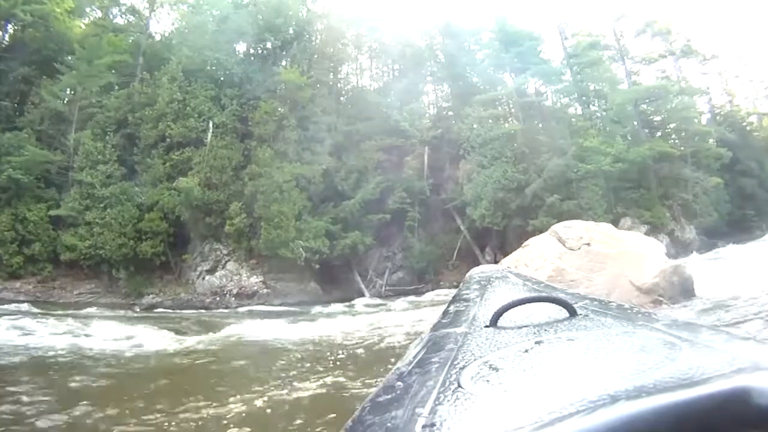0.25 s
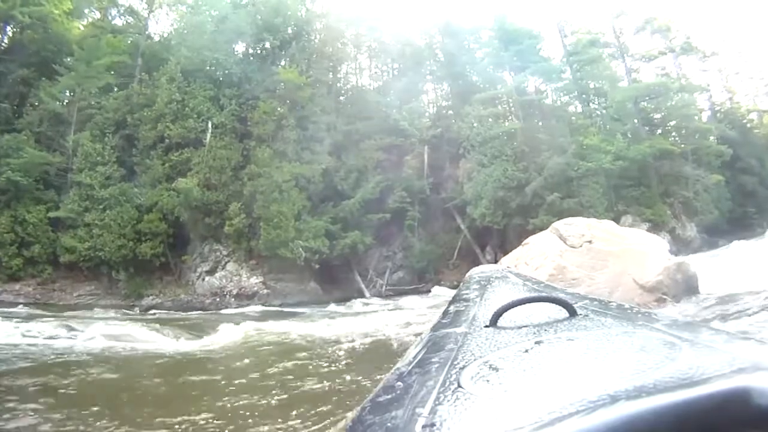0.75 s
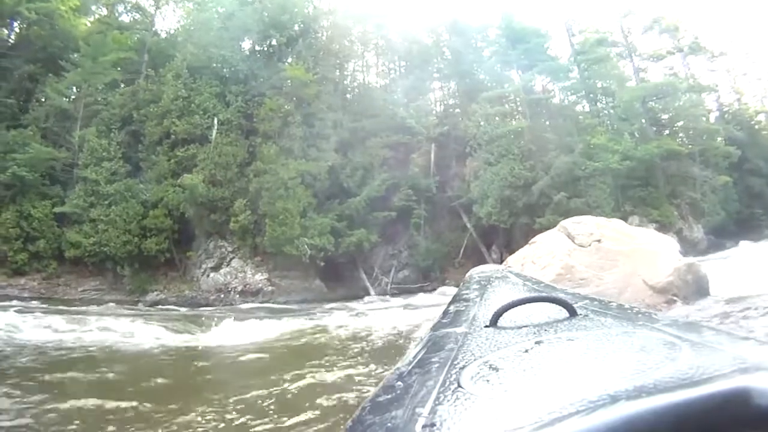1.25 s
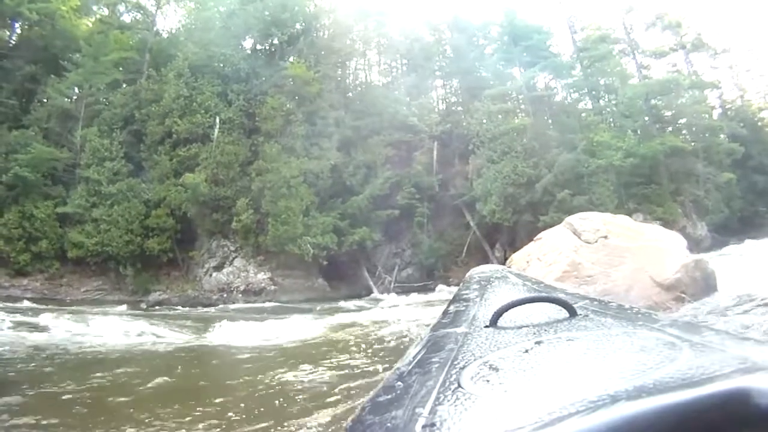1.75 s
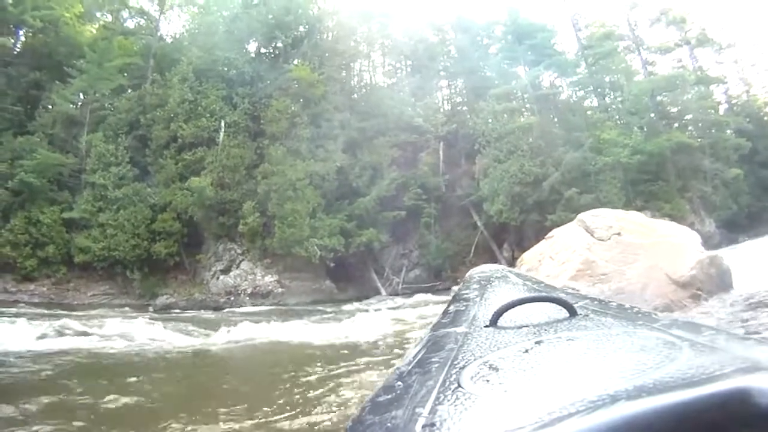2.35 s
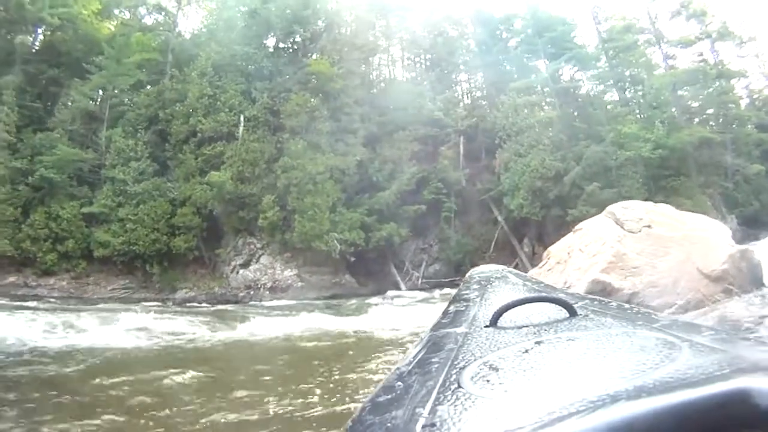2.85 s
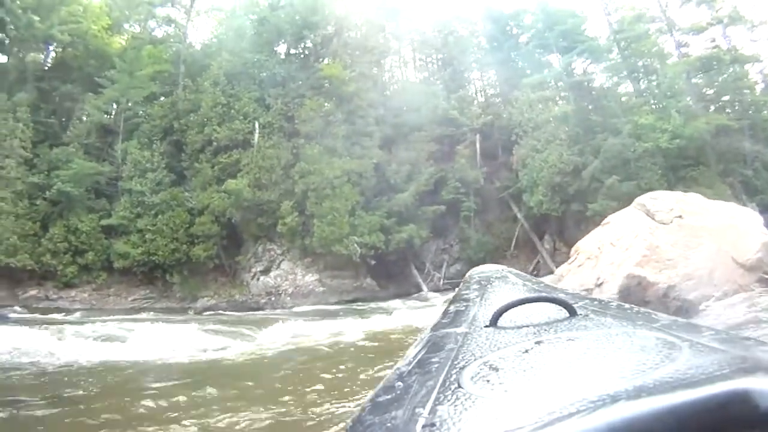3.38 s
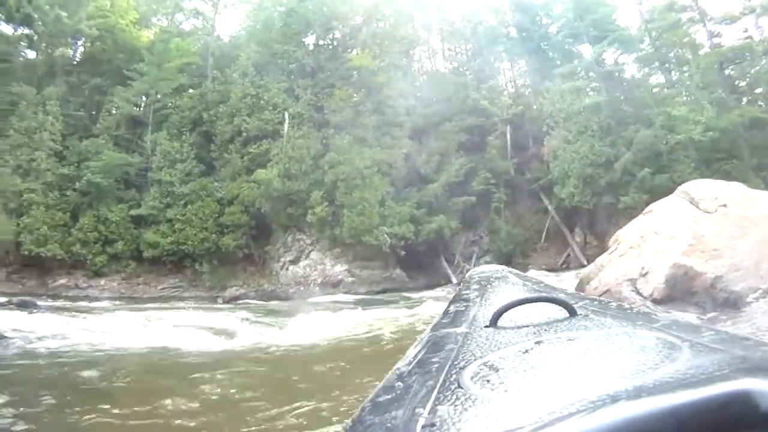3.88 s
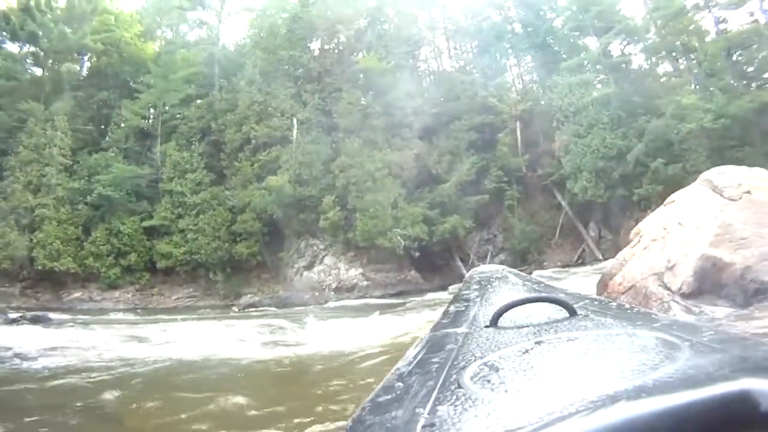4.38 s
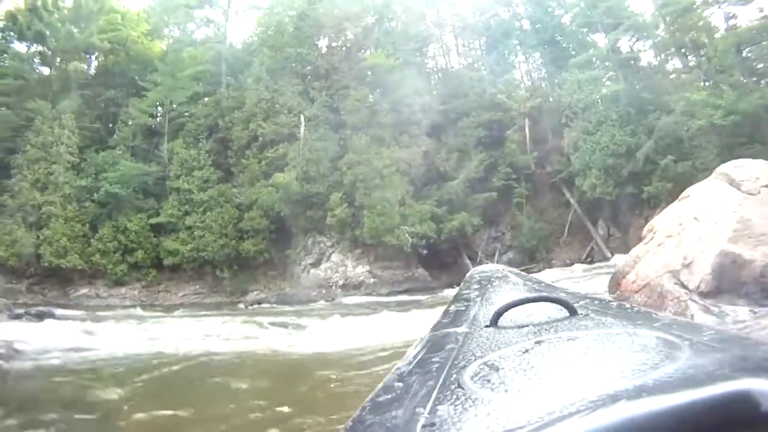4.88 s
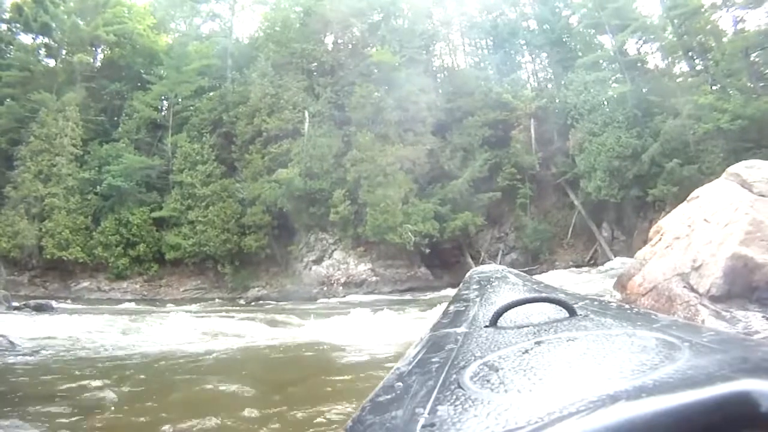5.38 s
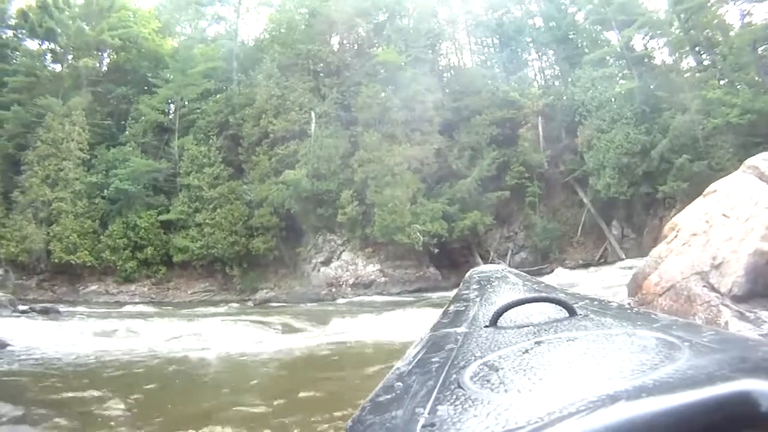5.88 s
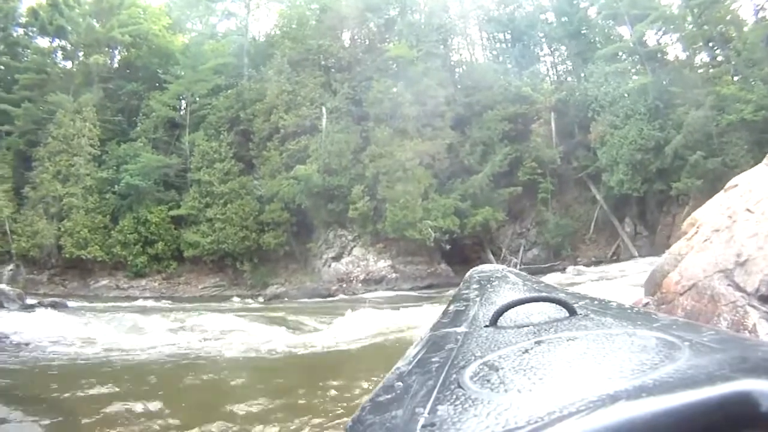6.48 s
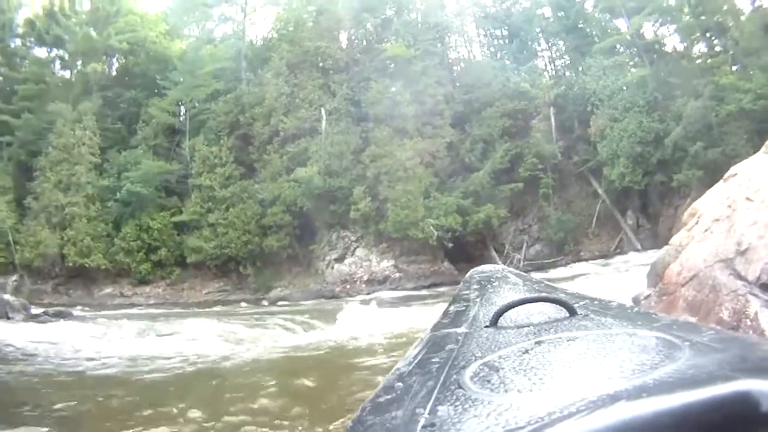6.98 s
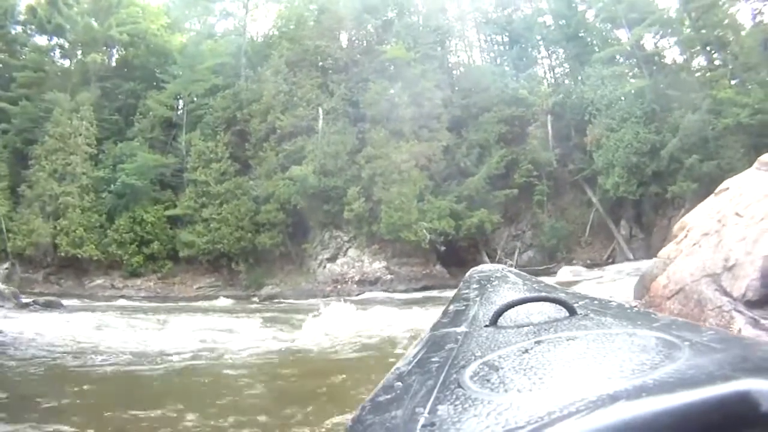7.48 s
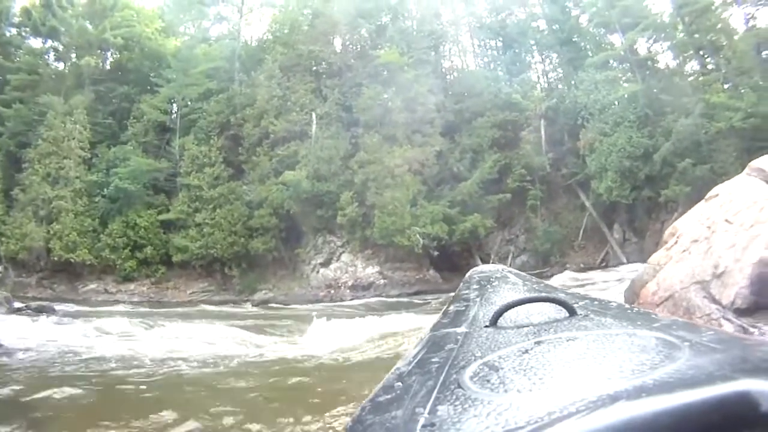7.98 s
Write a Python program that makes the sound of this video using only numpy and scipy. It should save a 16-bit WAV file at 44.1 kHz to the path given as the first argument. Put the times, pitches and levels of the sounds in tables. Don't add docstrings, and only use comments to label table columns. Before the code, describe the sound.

A low, thudding boat hull dominates, booming and slapping as water shoves it outdoors on a river. Each heavy blow brings a sharp plastic clack, then quick rattles and small hollow pings. The rush of rapids stays quiet, dull and constant behind. The microphone is shut in a small box fixed to the hull, giving boxy, gritty, lo-fi sound with slight overload on hard hits.

```python
import sys
import numpy as np
from scipy import signal
from scipy.fft import rfft, irfft
from scipy.io import wavfile
from scipy.ndimage import uniform_filter1d, map_coordinates

SR = 44100
rng = np.random.default_rng(int(sys.argv[2]) if len(sys.argv) > 2 else 0)


def transcribe(signal):
    frames = np.atleast_2d(signal).T
    limited = np.clip(frames, -1, 1)
    pcm = np.round(limited * 32767).astype(np.int16)
    wavfile.write(sys.argv[1], SR, pcm)


def level_to_linear(level):
    exponent = np.asarray(level, float) / 20
    return 10 ** exponent


N = 362943


def rms_one(x):
    return x / np.sqrt(np.mean(x ** 2) + 1e-20)


def drift(rate_hz):
    knots = rng.standard_normal(400)
    return map_coordinates(knots, [np.arange(N) / SR * rate_hz % 399], order=3)


def coloured(spectrum, peaks=()):
    hz = np.fft.rfftfreq(N, 1 / SR) + 1e-3
    corner_hz, corner_db = np.transpose(spectrum)
    level_db = np.interp(np.log(hz), np.log(corner_hz), corner_db, -90, -90)
    for centre_hz, width_hz, peak_db in peaks:
        level_db = level_db + peak_db / (1 + (2 * (hz - centre_hz) / width_hz) ** 2)
    return rms_one(irfft(rfft(rng.standard_normal(N)) * level_to_linear(level_db), N))


def band(x, low_hz, high_hz):
    return signal.sosfilt(signal.butter(2, [low_hz, high_hz], "band", fs=SR, output="sos"), x)


def band_noise(low_hz, high_hz):
    return rms_one(band(rng.standard_normal(N), low_hz, high_hz))


def ring(force, modes):
    out = 0
    for hz, level_db, t60 in modes:
        radius = level_to_linear(-60 / (t60 * SR))
        angle = 2 * np.pi * hz / SR
        gain = level_to_linear(level_db) * np.sin(angle)
        poles = [1, -2 * radius * np.cos(angle), radius * radius]
        out = out + signal.lfilter([0, gain], poles, force + 1e-18)
    return out


def contacts(times, peak_db, spread_s, rough):
    force = np.zeros(N)
    t = np.arange(600) / SR
    chatter = rng.standard_normal((len(times), len(t))) * np.exp(-(t / spread_s) ** 2)
    for s, level_db, shape, share in zip(times, peak_db, chatter, np.broadcast_to(rough, len(times))):
        at = round(s * SR)
        force[at:at + len(t)] += level_to_linear(level_db) * share * shape / np.sqrt(np.sum(shape ** 2))
        force[at] += level_to_linear(level_db) * (1 - share)
    return force


def shudders(rows, partials, glide, glide_s):
    out, envelope = np.zeros(N), np.zeros(N)
    phases = 0.15 * rng.standard_normal((len(rows), len(partials)))
    for (s, peak_db, hz, t60, rise), later, phase in zip(rows, rows[1:] + [(99, 0, 0, 0, 1)], phases):
        at = np.arange(max(0, round((s - 1.6 * rise) * SR)), min(N, round((s + t60) * SR)))
        t = at / SR - s
        since = t + 1.427 * rise
        swell = np.sin(np.pi / 2 * np.clip(since / (2.08 * rise), 0, 1)) ** 0.82
        stilled = np.clip((later[0] - at / SR) / later[4], 0, 1)
        shape = level_to_linear(peak_db - 60 * np.maximum(t, 0) / t60) * swell * stilled
        cycles = hz * (since + glide * glide_s * (1 - np.exp(-since / glide_s)))
        tone = sum(level_to_linear(db) * np.sin(2 * np.pi * (ratio * cycles + p))
                   for (ratio, db), p in zip(partials, phase))
        out[at] += shape * tone
        envelope[at] += shape
    return out, envelope


# t/s, rumble level/dB
CURRENT = [(0, -46), (1.1, -48), (1.8, -40.5), (2.4, -45), (2.55, -51), (2.75, -44.5), (3.2, -49),
           (3.45, -41), (3.9, -50), (4.7, -47.5), (5.45, -49), (5.75, -49.5), (6.1, -49.5), (6.35, -47.5),
           (6.52, -44), (8.23, -47.5)]
# f/Hz, level/dB per Hz
RUSH_SPECTRUM = [(250, -23), (490, -27), (1000, -33), (1600, -32), (3200, -28), (4800, -29), (5600, -36),
                 (6000, -45)]
# f/Hz, width/Hz, level/dB
CASE_AIR = [(696, 136, 10), (1050, 260, 12.5), (1417, 110, 9), (2278, 990, 13.5), (2694, 435, -9),
            (4370, 570, -8), (5100, 360, 6)]
# f/Hz, level/dB per Hz
RUMBLE_SPECTRUM = [(10, -9), (20, 11.5), (44, -10.5), (75, 6), (120, -9), (200, -5.5), (300, -17.5),
                   (500, -25.5)]


def river():
    rush = level_to_linear(-49.5 + 0.06 * drift(12.0)) * coloured(RUSH_SPECTRUM, CASE_AIR)
    s, rumble_db = np.transpose(CURRENT)
    current_db = np.interp(np.arange(N) / SR, s, rumble_db)
    return rush + level_to_linear(current_db + 2.0 * drift(5.2)) * coloured(RUMBLE_SPECTRUM)


# t/s of peak, level/dB, f/Hz, t60/s
HEAVES = [(0.011, -12.5, 71, 0.095), (0.052, -12.5, 63.5, 0.032), (0.081, -16, 67.2, 0.14),
          (0.167, -15.5, 85.8, 0.31), (0.248, -19, 82, 0.068), (0.383, -10, 71.2, 0.14),
          (0.441, -17.5, 72.3, 0.13), (1.283, -27.5, 88, 0.3), (1.42, -14.5, 77.3, 0.18),
          (1.469, -17, 72, 0.34), (2.009, -16, 66.6, 0.13), (2.276, -29, 72.2, 0.3),
          (3.018, -22, 80.5, 0.19), (3.081, -33.5, 66.8, 0.8), (4.152, -15, 66, 0.17),
          (4.21, -23, 76.8, 0.42), (4.884, -24, 75, 0.19), (5.149, -7.5, 77.3, 0.084),
          (5.2, -13.5, 68, .12), (5.279, -24, 76, 0.25), (5.854, -15, 68.4, 0.31),
          (5.949, -27.5, 75.4, 0.29), (7.122, -16, 75.6, 0.2), (7.176, -13.5, 78.7, 0.23),
          (7.234, -23, 71, 0.36), (7.288, -14.5, 68, 0.1), (7.353, -18.5, 66.1, 0.16),
          (7.461, -21, 68.8, 0.24), (7.628, -12.5, 78.6, 0.17)]
# t/s of peak, level/dB, f/Hz
FURTHER_PUSHES = [(0.321, -25, 68), (0.493, -30, 73), (0.562, -18.5, 70), (0.598, -21.5, 73), (1.496, -16, 73),
                  (1.575, -26.5, 67.4), (1.621, -31, 63), (1.703, -30.5, 70), (2.092, -28.5, 69.2),
                  (2.169, -31.5, 62), (4.296, -25.5, 47.5), (4.482, -30, 48.3), (4.528, -23.5, 61.2),
                  (4.923, -21.5, 70), (4.952, -19, 57.7), (4.995, -19, 72), (5.029, -23, 59.6), (5.37, -32, 64.5),
                  (5.885, -14.5, 69), (6.525, -37, 76), (6.804, -21, 67.5), (6.855, -17.5, 69.7), (6.89, -20, 68.7),
                  (6.922, -24, 66), (6.982, -23.5, 46.3), (7.323, -22, 65), (7.411, -28, 61), (7.594, -19.5, 69.6),
                  (7.697, -22, 58), (7.751, -25.5, 65), (7.82, -31.5, 53.6)]
# t/s of peak, level/dB, f/Hz, rise/s, t60/s of the ring
PUNCHES = [
    (1.173, -9, 83.6, 0.02, 0.11),
    (1.945, -12.5, 74.4, 0.01, 0.094),
    (2.935, -9.5, 77.2, 0.015, .11),
    (4.054, -7, 81, 0.014, 0.34),
    (4.386, -9.5, 77.6, 0.015, 0.2),
    (4.848, -7, 94.4, 0.0113, 0.1),
    (5.069, -11, 68.8, 0.012, 0.91),
    (6.74, -5.5, 78.5, 0.0096, 0.12),
    (7.051, -8.5, 76.6, 0.016, 0.37),
]


def pushes():
    rows = []
    for s, db, hz, rise, t60 in PUNCHES:
        rows.append((s, db, hz, 0.063, rise))
        rows.append((s + 0.02575, db - 5, hz * 0.882, t60, 0.0126))
    rows += [(*row, 0.01555) for row in HEAVES]   # rise, s
    rows += [(*row, 0.13, 0.0159) for row in FURTHER_PUSHES]
    return sorted(rows)


def boom():
    partials = [(0.9484, 0.5), (1.254, -9.5), (0.793, -9.5)]
    tone, push = shudders(pushes(), partials, glide=0.36, glide_s=0.013)
    surge = level_to_linear(-12.5) * push * band_noise(22.4, 39.2)
    linger = signal.lfilter([.0003], [1, -.9997], push)
    return tone + surge + level_to_linear(-13) * linger * band_noise(50.4, 90.0)


# t/s, level/dB
TICKS = [(0.019, -42), (0.029, -46), (0.037, -42), (0.0583, -43), (0.0662, -39), (0.0734, -38),
         (0.3805, -41.5), (0.3934, -40), (0.4074, -40), (0.5796, -43), (1.1644, -44), (1.1744, -39),
         (1.183, -41), (1.1924, -39.5), (1.2186, -46), (1.2311, -46), (1.491, -41), (1.5183, -37.5),
         (1.553, -40), (1.6287, -42), (1.972, -60), (1.98, -48), (1.9895, -50), (2.0044, -55),
         (2.0215, -46), (2.0284, -48), (2.0562, -37), (2.061, -47), (2.094, -42.5), (2.1352, -41.5),
         (2.175, -44), (2.964, -38), (2.9704, -42), (2.9986, -38), (3.026, -38), (3.051, -43), (3.057, -41),
         (4.0547, -30), (4.0664, -50), (4.085, -42), (4.144, -46), (4.1765, -35.5), (4.2223, -34),
         (4.246, -39), (4.281, -45), (4.296, -40), (4.3385, -47), (4.4064, -35.5), (4.4857, -40),
         (4.557, -35)]
# t/s, level/dB
LATE_TICKS = [(4.8793, -47), (4.8924, -46), (4.934, -42), (4.9604, -39), (4.9664, -40), (4.974, -45),
              (5.0025, -40), (5.0157, -38), (5.097, -34.5), (5.1322, -39), (5.1384, -46), (5.1465, -39),
              (5.1534, -44), (5.1624, -40), (5.1744, -45), (5.1921, -36), (5.2064, -44), (5.2315, -36.5),
              (5.2444, -41), (5.2574, -43), (5.8561, -40.5), (6.7516, -37), (6.7634, -46), (6.773, -44),
              (6.7814, -50), (6.7934, -50), (6.8034, -57), (6.8289, -55), (6.8484, -60), (6.8675, -36),
              (6.8744, -47), (6.911, -33.5), (6.9172, -37), (6.939, -38.5), (6.9714, -38), (7.0, -39.5),
              (7.0774, -41), (7.1314, -35.5), (7.1497, -40), (7.1681, -40), (7.209, -40), (7.2809, -41),
              (7.3, -36), (7.3133, -31.5), (7.325, -36.5), (7.3394, -42), (7.579, -49), (7.657, -39.5)]
# f/Hz, level/dB, t60/s
LATCH = [(2410, 0.5, 0.015), (3830, 7.5, 0.0049), (4710, 6, 0.0038), (5560, 1, 0.0036)]


def latch():
    s, peak_db = np.transpose([*TICKS, *LATE_TICKS])
    return ring(contacts(s, peak_db, 0.006, rough=0.58), LATCH)


# t/s of first peak, level/dB, f/Hz, loss/dB per slap
SLAP_RUNS = [(0.026, -21.5, 200, 12), (0.165, -28, 204.2, -6), (0.234, -28, 193, 13),
             (0.372, -27.5, 199.5, -4.5), (0.46, -41.5, 212, -7), (0.55, -25.5, 212, 7),
             (1.141, -23, 288, -4), (1.175, -24.5, 216, 3.5), (1.392, -21, 200.4, -1.5),
             (1.558, -30, 197.4, 6), (1.932, -25.5, 191, -1), (2.928, -19, 190, -1), (2.989, -25.5, 199, 7),
             (3.401, -33.5, 181, 12), (4.041, -10, 177.4, 10), (4.098, -27, 173, 1.5),
             (4.364, -20, 212.3, -3), (4.84, -13, 163, 8), (4.891, -28.5, 193, 1), (5.015, -30, 189, -4),
             (5.062, -19, 194.5, -3), (5.15, -19, 197, 6.5), (5.836, -20, 211, -2),
             (6.666, -26.5, 195.6, 10), (6.734, -6.5, 186, 22), (6.863, -35, 188, -1),
             (7.034, -18.5, 158.5, 5), (7.102, -29.5, 165, -3.5), (7.256, -32, 175, -2),
             (7.576, -32.5, 161, -3)]


def slap_rows():
    gap_s, jitter, sag = .022, 0.13, 0.97
    rows, k = [], np.arange(7)
    chance = rng.standard_normal((len(SLAP_RUNS), 3, len(k))) * (k > 0)
    for (s, db, hz, loss_db), later, (late, loud, high) in zip(SLAP_RUNS, SLAP_RUNS[1:] + [(99,)], chance):
        times = s + gap_s * (k + jitter * late)
        levels = db - loss_db * k - 1.32 * k ** 2 + 2 * loud
        pitches = hz * sag ** k * (1 + 0.066 * high)
        for row in zip(times, levels, pitches):
            if row[0] < later[0] - gap_s / 2:
                rows.append((*row, .11, .0065))
    return rows


# frequency ratio, level/dB
PANEL = [(0.797, 1), (1.002, 1.5), (1.202, -7), (1.5, -5), (2.0, -13.5)]


def slaps():
    slap, smack = shudders(slap_rows(), PANEL, glide=0.19, glide_s=0.0079)
    return level_to_linear(-5.0) * band(slap, 94, 398) + level_to_linear(-24) * smack * band_noise(370, 1300)


# t/s, level/dB, f/Hz
DROPS = [(1.39, -32, 1110), (1.455, -27, 2570), (1.605, -32, 1150), (1.675, -35, 1020),
         (2.062, -32.5, 1100), (2.145, -35.5, 870), (2.933, -27, 1010), (2.941, -14, 1024),
         (2.949, -24, 950), (2.928, -14, 520.5), (2.944, -16, 480), (2.957, -31, 560), (2.968, -31, 600),
         (2.984, -40, 560), (4.044, -22, 476), (1.138, -29.5, 1010), (1.17, -24, 670), (5.855, -28, 1040),
         (2.962, -39, 1300), (2.975, -31, 1090), (3.764, -39, 1380), (3.853, -32.5, 845),
         (4.1125, -10, 2120), (4.1165, -42, 2100), (4.907, -30.5, 1000), (4.987, -23, 1110),
         (5.115, -30, 990), (5.22, -35, 1126), (5.232, -41, 2330), (6.73, -19.5, 880), (6.755, -42, 1010),
         (6.77, -42, 1100), (6.808, -38, 1050), (6.912, -37, 2350), (4.04, -20, 950), (4.046, -24, 990),
         (2.925, -33, 890), (4.117, -32, 1200), (4.121, -34, 1740), (4.119, -30, 2410), (5.124, -36, 900),
         (5.135, -35, 1000), (6.962, -36, 1000), (5.629, -28.5, 980), (6.626, -27.5, 2410),
         (7.203, -37, 1008)]
# f/Hz, level/dB, t60/s
HOLLOW = [(683.5, -2.5, 0.053)]
HOLLOW_LAG_S = 0.00496


def drops():
    out = np.zeros(N)
    t = np.arange(3000) / SR
    splash = rng.standard_normal((len(DROPS), len(t))) * np.exp(-(t / 0.0033) ** 2)
    for (s, db, hz), shape in zip(DROPS, splash):
        force = level_to_linear(db) * (0.91 * shape / np.sqrt(np.sum(shape ** 2)) + 0.17 * (t == 0))
        answer_db = 0.5 - max(db + 24, 0) - 20 * (hz > 1500 or hz < 800)
        answer = np.roll(ring(force, [(HOLLOW[0][0], answer_db, .035)]), round(HOLLOW_LAG_S * SR))
        out[round(s * SR):][:len(t)] += ring(force, [(hz, 0, .016)]) + answer
    return out


# t/s, level/dB, hollow level/dB, bright level/dB, lean to low modes/dB
KNOCKS = [(1.4078, -14, -16, -26, 5), (1.435, -24, -14, -10, -2), (1.4474, -20.5, -17, -29, 2),
          (1.4545, -30, -7, -16, 5), (1.5205, -32.5, -5, -11, 4), (1.5352, -30, 2.5, -18, 6.5),
          (1.945, 4, -47, -8.5, 0), (1.973, -46, -9, -20, 4), (1.998, -44, 8, -20, 6),
          (2.9399, -8, -14, -21.5, 1.5), (4.0509, -3.5, -26, -15.5, 1.5), (4.1127, -17, -20, 5, -1),
          (4.1266, -34, -17, -24, -4), (4.098, -40, -10, -7, 0), (4.171, -35.5, 2, -10, 2),
          (4.183, -33, -12, -20, 7), (4.8524, 0, -34, -18.5, 0), (4.881, -27.5, -10, -16, 3),
          (4.897, -43, -7, -16, 0), (4.9796, -31.5, -4, -20, 2), (5.058, -31, 0, -20, 6),
          (5.0704, -20, 0, -17.5, 6.5), (5.098, -28.5, -11, -17, 0), (5.1063, -28, -8, -10, 2),
          (6.664, -29, -13, -30, 3), (6.7354, -20.5, -1.5, -22, 4), (6.742, -12.5, -40, -16, 4.5),
          (6.789, -33, -13, -22, 4), (6.8122, -27.5, -9, -25, 1), (6.8622, -28.5, -6, -17, 2),
          (6.8817, -24.5, -3, -26, -2.5), (6.96, -41, 8, -20, 5), (7.046, -40, -11, 0, 0),
          (7.0536, -5.5, -20, -16.5, 1.5), (7.074, -27, -5, -14, 8)]
# f/Hz, level/dB, t60/s
SHELL = [(1060, -2.5, 0.02), (1366, -6, 0.013), (1830, 4, 0.026), (2350, 0, 0.019)]
# f/Hz, level/dB, t60/s
BRIGHT = [(3714, 5.5, 0.0096), (2960, -12, 0.007), (4800, -16, 0.0096), (5400, -20, 0.0045)]


def seat_damping(s, peak_db):
    free = np.zeros(N)
    free[np.round(s * SR).astype(int)[:, None] + np.arange(int(0.00348 * SR))] = 1
    last = np.maximum(np.searchsorted(np.sort(s) * SR, np.arange(N)) - 1, 0)
    slam_db = 1.8 * np.maximum(peak_db[np.argsort(s)] + 1.5, 0)[last]
    return level_to_linear((-8.5 - slam_db) * (1 - uniform_filter1d(free, size=20)))


def knocks():
    s, peak_db, hollow_db, bright_db, lean_db = np.transpose(KNOCKS)
    gritty = np.clip(.1 - peak_db / 150, 0, 1)
    seated = seat_damping(s, peak_db)
    low = ring(contacts(s, peak_db - 3 + lean_db, .0012, gritty), SHELL[:2])
    high = ring(contacts(s, peak_db - 3 - lean_db, .0012, gritty), SHELL[2:])
    dull = signal.sosfilt(signal.butter(3, 720, "high", fs=SR, output="sos"), seated * (low + high))
    dull += ring(contacts(s + HOLLOW_LAG_S / 2, peak_db + hollow_db + 5.5, 0.0028, rough=0.56), HOLLOW)
    grit = contacts(s, np.minimum(peak_db, -8) + 19.5, 0.0083, rough=0.54)
    dull += band(grit, 400, 9400)
    bright = seated * ring(contacts(s, peak_db + bright_db - 1, .001, rough=.08), BRIGHT)
    return dull, band(bright, 2630, 4220)


def case():
    dull, bright = knocks()
    walls = signal.butter(4, 2750, fs=SR, output="sos")
    dull = signal.sosfilt(walls, dull + drops())
    return band(dull, 730, 2700) + band(bright + latch(), 1330, 6400)


def scene():
    return np.tile(river() + boom() + slaps() + case(), (2, 1))


# t/s, length/s, lower edge f/Hz, share lost
TREBLE_GAPS = [
    (1.243, .014, 4500, .75),
    (1.46, .028, 2800, .97),
    (5.032, .022, 1150, .85),
    (7.358, .022, 700, .75),
]


def treble_gaps(x):
    t = np.arange(N) / SR
    narrow = signal.butter(2, [3680, 3900], "band", fs=SR, output="sos")
    kept = 2.2 * signal.sosfiltfilt(narrow, x)
    for s, length, above_hz, lost in TREBLE_GAPS:
        top = signal.sosfiltfilt(signal.butter(4, above_hz, "high", fs=SR, output="sos"), x)
        gate = uniform_filter1d(1. * (t > s) * (t < s + length), size=300)
        x = x - lost * (top - kept * (above_hz < 3700)) * gate
    return x


def roll_off(x):
    return signal.sosfilt(signal.butter(12, 15700, fs=SR, output="sos"), x)


def record(dry):
    overloaded = dry[0] / (1 + (dry[0] / 1.05) ** 4) ** .25
    slow = signal.resample_poly(overloaded, 40, 147)
    held = signal.resample_poly(np.repeat(slow, 4), 147, 160)[:N]
    held = np.clip(np.pad(held, (0, N - len(held))), -1, 1)
    held = treble_gaps(held)
    apart = uniform_filter1d(1. * (np.abs(held) > .5), size=5000, origin=2300) > 0
    error = level_to_linear(-35.5) * apart * (held + 4.3 * np.gradient(held)) * band_noise(21, 240)
    steep = signal.cheby2(12, 80, 16700, fs=SR, output="sos")
    mix = signal.sosfilt(steep, [held + error, held - error])
    return roll_off(mix)


dry = scene()
out = record(dry)
transcribe(out)
```